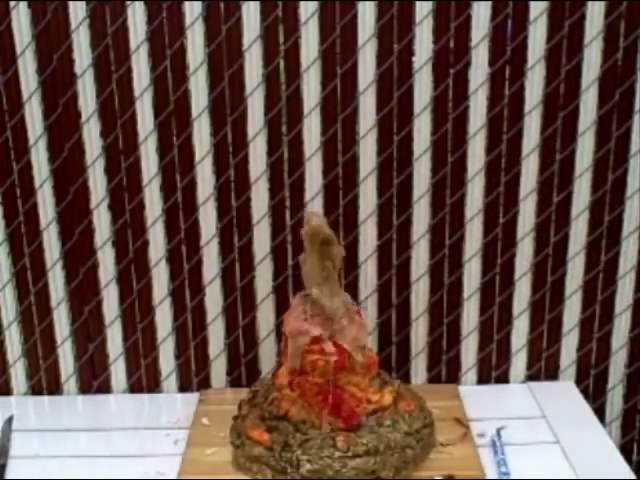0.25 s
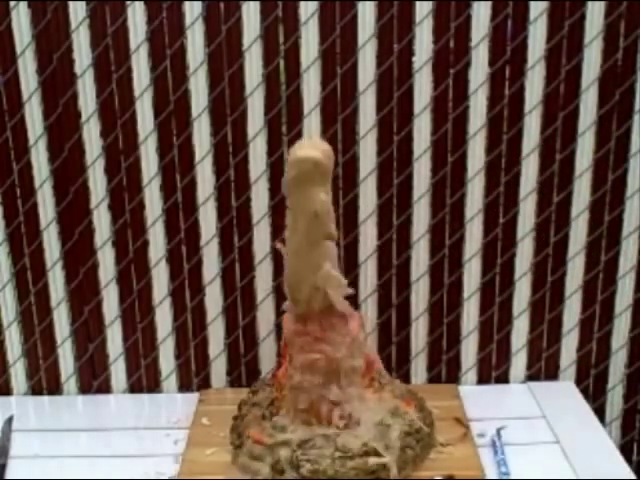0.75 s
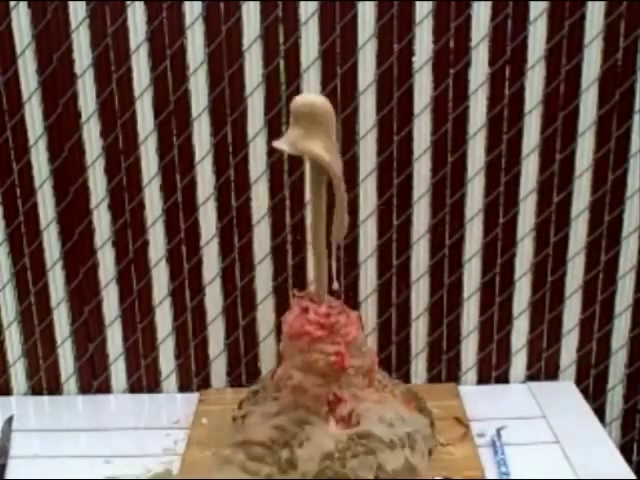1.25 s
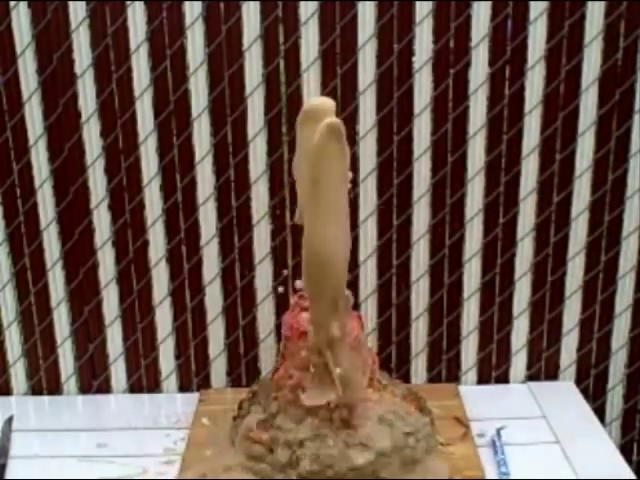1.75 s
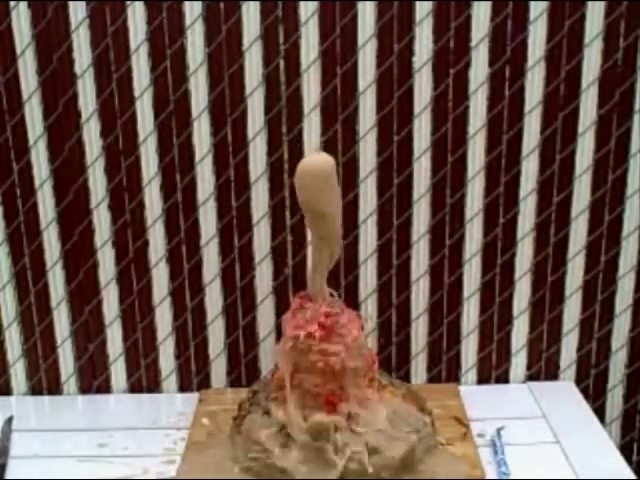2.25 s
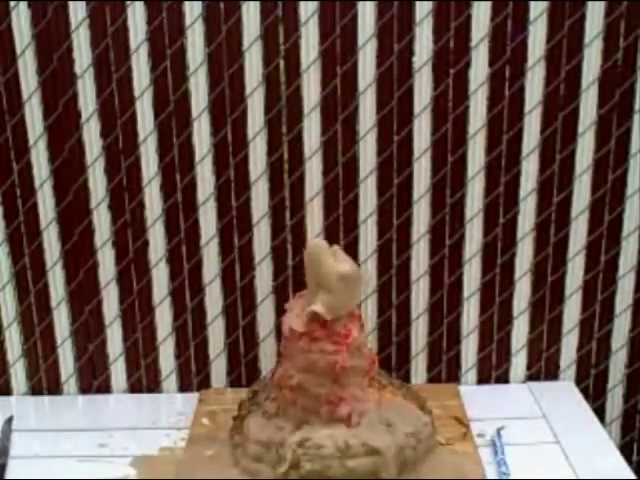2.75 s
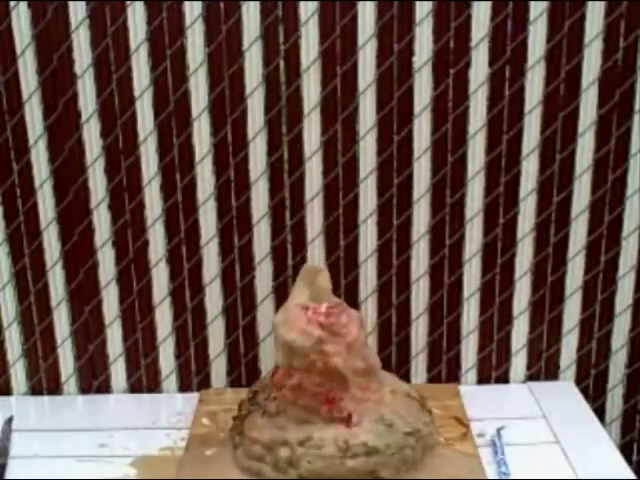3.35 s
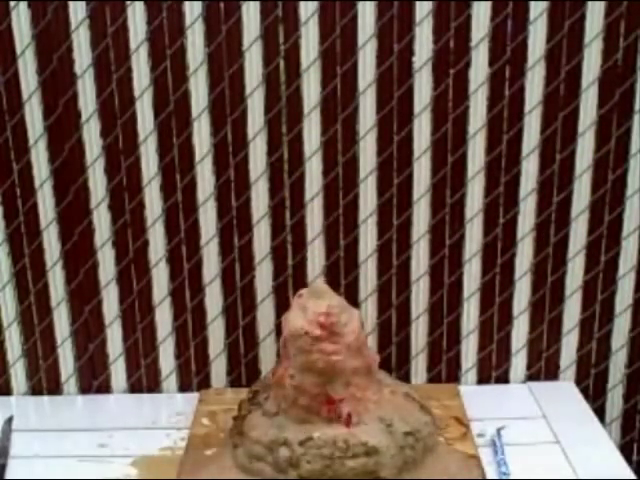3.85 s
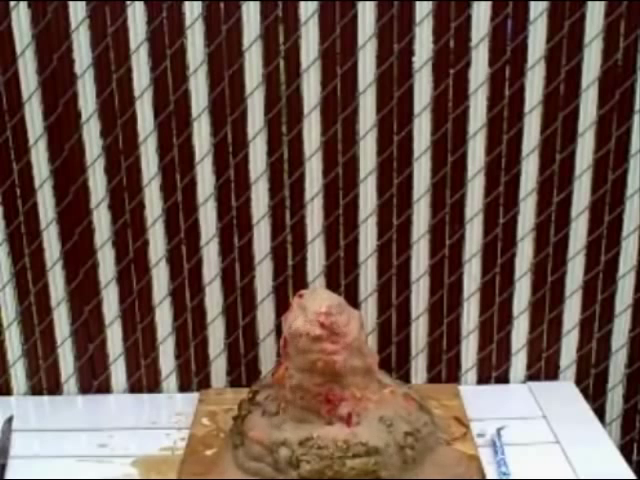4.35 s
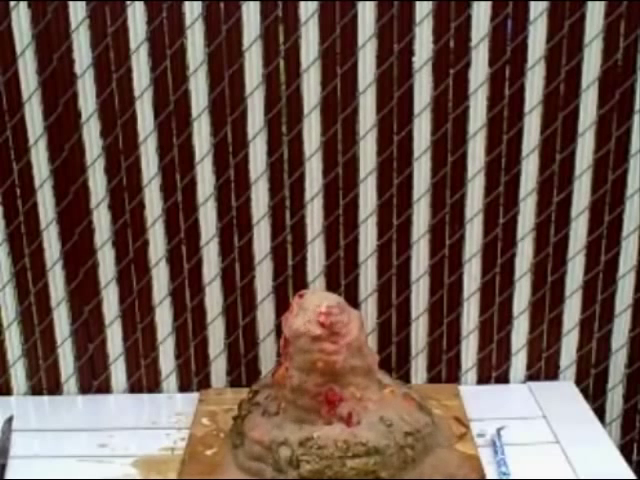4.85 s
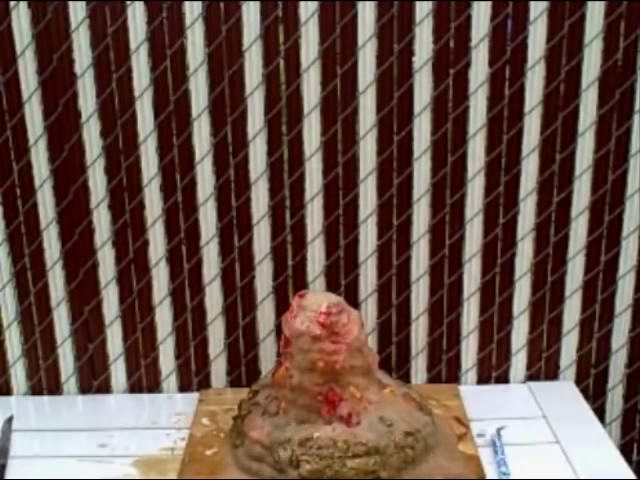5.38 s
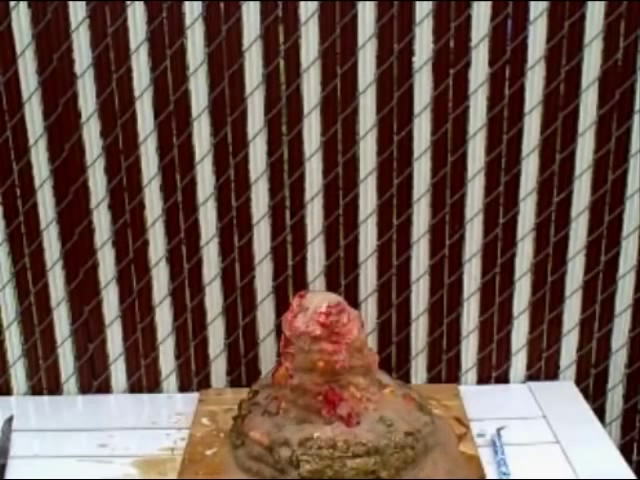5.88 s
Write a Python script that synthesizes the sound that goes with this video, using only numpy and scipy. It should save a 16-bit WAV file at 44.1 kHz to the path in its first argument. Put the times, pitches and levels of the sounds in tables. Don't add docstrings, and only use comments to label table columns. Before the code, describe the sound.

Outdoors, a fizzy drink bursts upward and splashes back in three heavy slaps, then crackling fizz and drips continue over distant traffic hum.

```python
import sys
import numpy as np
from scipy import signal
from scipy.fft import rfft, irfft, next_fast_len
from scipy.io import wavfile
from scipy.ndimage import uniform_filter1d, minimum_filter1d

SR = 44100
rng = np.random.default_rng(int(sys.argv[2]) if len(sys.argv) > 2 else 0)


def volts_from_db(level):
    exponent = np.asarray(level, float) / 20
    return 10 ** exponent


def put_to_file(sound):
    columns = np.atleast_2d(sound).T
    safe = np.clip(columns, -1, 1)
    whole_steps = np.round(safe * 32767)
    wavfile.write(sys.argv[1], SR, whole_steps.astype(np.int16))


N = 269662
TIME = np.arange(N) / SR
FAST = next_fast_len(N)
BINS_HZ = np.maximum(np.fft.rfftfreq(FAST, 1 / SR), 1)
CAMERA_HZ = 16000
SHOULDER_HZ, TOP_HZ, EDGE_HZ = 6070, 6390, 7284

# [f/Hz, level/dB]
SPATTER_COLOUR = [(500, -16), (1000, -7.5), (2200, -1), (3600, -2), (4200, -3.5), (5000, -6), (6000, -2.5),
                  (7400, -8.5)]
# [f/Hz, level/dB]
BODY_COLOUR = [(90, -1), (200, -6), (500, -2.5), (1000, -5.5), (1600, -10), (3000, -27)]


def unit(x):
    return x / np.sqrt(np.mean(x ** 2))


def course(points):
    return np.interp(TIME, *np.transpose(points))


def colour(x, points):
    hz, db = np.transpose(points)
    gain = volts_from_db(np.interp(np.log(BINS_HZ), np.log(hz), db))
    return irfft(rfft(x, FAST) * gain, FAST)[:N]


def band(x, lo_hz, hi_hz):
    inside = (BINS_HZ >= lo_hz) & (BINS_HZ < hi_hz)
    return irfft(rfft(x, FAST) * inside, FAST)[:N]


def walk(rate_hz):
    k = int(SR / rate_hz)
    held = np.repeat(rng.standard_normal(N // k + 1), k)[:N]
    return unit(uniform_filter1d(uniform_filter1d(held, k), k))


def fade(x, t60_s):
    pole = np.exp(-np.log(1000) / (t60_s * SR))
    return signal.lfilter([1], [1, -pole], x)


def patter(rate_hz, spread_db, t60_s, bed):
    chance = rng.random((2, N))
    sizes = volts_from_db(-spread_db * np.log(1 - chance[1]))
    drops = (chance[0] < rate_hz / SR) * sizes
    return unit(bed + unit(fade(drops, t60_s)))


def hiss(points, gate):
    noise = rng.standard_normal(N)
    return colour(noise * gate, points) / np.std(colour(noise, points))


def foam():
    # [t/s, level/dB]
    flow_course = [(0.0, -60.5), (0.174, -59.5), (0.528, -51), (0.862, -49), (1.0, -51), (1.078, -41),
                   (1.236, -44), (1.3, -35), (1.42, -36.5), (1.5, -43), (1.67, -37.5), (1.78, -43.5),
                   (1.92, -40.5), (2.41, -41.5), (3.13, -40.5), (4.03, -43.5), (4.54, -43.5), (6.11, -42.5)]
    # [f/Hz, level/dB]
    fizz_colour = [(4000, -27), (4700, -15.5), (5200, -14.5), (5400, -5), (5850, -1), (6250, -9),
                   (6600, -6), (7400, -11.5)]
    usual_flow_db, fizz_starts_s = -43, 0.15
    surge_db = 0.49 * walk(20)
    flow_db = course(flow_course)
    extra_db = flow_db - usual_flow_db
    fizz_db = -42.5 + 1.03 * extra_db + 1.5 * walk(4)
    fizz_db -= 200 * np.maximum(fizz_starts_s - TIME, 0)
    body_db = -51 + 0.45 * extra_db + 1.3 * walk(4)

    drops = patter(600, 2.5, 0.015, 1.2)
    bubbles = patter(340, 2.6, 0.027, 0.44)
    spatter = hiss(SPATTER_COLOUR, drops * volts_from_db(flow_db + surge_db + 2.5 + 0.92 * walk(30)))
    fizz = hiss(fizz_colour, bubbles * volts_from_db(fizz_db + surge_db + 5.0 + 1.1 * walk(25.21)))
    body = hiss(BODY_COLOUR, np.sqrt(drops) * volts_from_db(body_db + surge_db + 0.83))
    return spatter + fizz + body


def strays(count):
    chance = rng.standard_normal((count, 3)).T
    start_s = np.linspace(2.4, TIME[-1] - 0.1, count) + 0.04 * np.tanh(chance[0])
    levels_db = -32.5 + 3 * np.tanh(chance[1:])
    return np.transpose([start_s, *levels_db])


def splats():
    # [t/s, peak/dB, port band/dB]
    early_drops = [(.1864, -39.5, -37), (.359, -38.5, -53), (.4394, -39.5, -35), (.5262, -28.5, -53),
                   (.5851, -38.5, -40), (.742, -33.5, -42), (.7542, -26.5, -32.5), (.8011, -26, -34),
                   (.821, -36, -47), (.8362, -21, -28), (.8427, -33, -41.5), (.9514, -43, -28.5),
                   (.9931, -33, -50), (1.022, -35, -28), (1.041, -27.5, -30)]
    # [t/s, peak/dB, port band/dB]
    column_slaps = [(1.058, -33, -40), (1.08, -30, -25.5), (1.1059, -26, -28), (1.119, -28, -22.5),
                    (1.1325, -16.5, -23), (1.1423, -16.5, -18), (1.1554, -9.5, -9), (1.168, -14.5, -8.5),
                    (1.1747, -11.5, -9.5), (1.1878, -17, -20), (1.2076, -38, -23.5), (1.25, -10.5, -41),
                    (1.263, -6, -10), (1.294, -15.5, -43), (1.3359, -2, -20), (1.3422, -15.5, -17),
                    (1.3462, -30, -3.5), (1.358, -15, -18.5), (1.3815, -19.5, -15.5), (1.402, -18, -12.5),
                    (1.4103, -28, -29)]
    # [t/s, peak/dB, port band/dB]
    foam_drips = [(1.456, -16, -43), (1.5206, -27.5, -46), (1.5464, -22.5, -54), (1.6233, -13.5, -39),
                  (1.768, -20.5, -27.5), (1.83, -26.5, -22.5), (1.881, -17, -24.5), (1.924, -19, -32),
                  (1.961, -30, -23), (2.038, -19.5, -29), (2.159, -20, -26), (2.255, -19, -23),
                  (2.3168, -15, -18.5), (2.3484, -22, -26), (2.5519, -19.5, -28), (2.635, -27.5, -25),
                  (2.75, -22, -27.5),
                  (2.905, -24.5, -29), (3.107, -23, -31.5), (3.139, -22.5, -29.5), (3.399, -18, -34),
                  (3.416, -23.5, -32), (3.5922, -18.5, -21), (3.696, -27, -28.5), (3.8477, -28.5, -45),
                  (4.039, -26, -37), (4.084, -22.5, -40.5), (4.3312, -25.5, -26.5), (4.6196, -26.5, -28),
                  (4.9883, -23.5, -29.5), (5.0817, -27, -23.5), (5.115, -26.5, -28), (5.1743, -23.5, -26.5),
                  (5.278, -25.5, -27), (5.37, -25, -26.5), (5.448, -24.5, -24.5), (5.5298, -24.5, -34),
                  (5.7154, -22, -30.5), (5.816, -24.5, -26.5), (5.994, -21.5, -23.5)]
    # [f/Hz, level/dB]
    port_colour = [(3800, -31.5), (4500, -10), (5030, -3), (5250, -0.5), (5550, -5.5), (5850, 0.5),
                   (6250, -6.5), (7400, -7.5)]
    thud_db, thud_of_ring_db = -21, -19.5
    late = [*foam_drips, *strays(count=18)]

    gates = np.zeros((3, N))
    age_s = TIME[:int(SR * 0.3)]
    for rows, t60_s in [(early_drops, 0.054), (column_slaps, 0.065), (late, 0.105)]:
        swell = 1 - np.exp(-age_s / (0.075 * t60_s))
        shape = swell * np.exp(-np.log(1000) * age_s / t60_s)
        for start_s, peak_db, port_db in rows:
            thud = volts_from_db(peak_db + thud_db) + volts_from_db(port_db + thud_of_ring_db)
            sizes = [volts_from_db(peak_db - 7.0), volts_from_db(port_db + 1.0), thud]
            start = int(start_s * SR)
            stop = min(start + len(age_s), N)
            gates[:, start:stop] += np.outer(sizes, shape[:stop - start])
    gates *= patter(800, 1.5, 0.0072, 1.9)
    return hiss(SPATTER_COLOUR, gates[0]) + hiss(port_colour, gates[1]) + hiss(BODY_COLOUR, gates[2])


def ticks():
    # [t/s, tick peak/dB, port ring peak/dB]
    hard_drops = [(0.801, -25.5, -41), (0.844, -21.5, -41), (0.951, -39, -40), (1.143, -16, -21),
                  (1.157, -15.5, -10.5), (1.262, -16.5, -18.5), (1.338, -12.5, -11), (1.341, -15, -19),
                  (1.381, -14, -18.5), (1.401, -19, -19.5), (1.829, -30, -31.5), (2.317, -18, -27),
                  (2.554, -26, -33), (2.541, -21, -38), (2.907, -26.5, -39), (3.418, -23.5, -39.5),
                  (3.592, -23, -30), (4.949, -29, -32), (5.116, -31, -32), (5.279, -30, -37),
                  (5.996, -24.5, -28.5)]
    out = np.zeros(N)
    age_s = TIME[:int(SR * 0.02)]
    click = np.sin(2 * np.pi * 2300 * age_s) * np.exp(-age_s / 0.00027)
    swell = age_s / 0.00089 * np.exp(1 - age_s / 0.0013)
    detunes = rng.uniform(-1.2, 1, len(hard_drops))
    for (start_s, tick_db, ring_db), detune in zip(hard_drops, detunes):
        ring = swell * np.sin(2 * np.pi * (5500 + 350 * detune) * age_s)
        start = int(start_s * SR)
        out[start:start + len(age_s)] += click * volts_from_db(tick_db + 4.0) + ring * volts_from_db(ring_db)
    return out


def engine():
    # [t/s, level/dB]
    drone_level = [(0.0, -44.5), (0.66, -40.5), (0.94, -47), (1.14, -43), (1.31, -59), (1.58, -37.5),
                   (1.67, -45.5), (2.3, -35), (2.45, -47), (2.87, -40), (3.45, -48), (3.61, -43),
                   (4.17, -37.5), (4.65, -40), (4.9, -48.5), (5.36, -45.5), (5.63, -46), (6.11, -51.5)]
    # [t/s, f/Hz]
    drone_pitch = [(0, 51.35), (1.2, 51.3), (1.5, 50.13), (2.4, 48), (2.7, 51.6), (3.15, 43), (4.7, 39.6),
                   (5.6, 36.52), (6.11, 39.1)]
    low_hz, arrives_s, leaves_s, leaving_s = 27.2, 0.14, 0.77, 0.04
    low_db = -33 - 21.5 / (1 + np.exp((leaves_s - TIME) / leaving_s))
    low_db -= 12 * np.maximum(1 - TIME / arrives_s, 0)
    low_db += -1.5 + 1.5 * walk(7.9)
    low = np.sin(2 * np.pi * np.cumsum(low_hz * (1 + 0.05 * walk(22))) / SR)

    phase = 2 * np.pi * np.cumsum(course(drone_pitch)) / SR
    flutter = (0.93 + 0.41 * walk(13)) * np.sin(phase) + 0.5 * walk(13) * np.cos(phase)
    fifth = 0.3 * (1 + 0.5 * walk(5)) * np.sin(3 / 2 * phase)
    upper = unit(flutter) + fifth
    return low * volts_from_db(low_db) + upper * volts_from_db(course(drone_level) - 0.7)


def town():
    # [f/Hz, level/dB per Hz]
    hum_colour = [(12, -19.5), (30, -6), (55, -5.5), (75, -6.5), (100, -15), (200, -19), (400, -29.5),
                  (840, -37), (4000, -62)]
    hum = unit(colour(rng.standard_normal(N), hum_colour))
    return hum * volts_from_db(-45.5 + 0.56 * walk(1.536))


def scene():
    return (foam() + splats() + ticks() + engine() + town())[None]


def attacks(x):
    threshold_db, softness_db = 9.5, 1
    power = band(x, 600, EDGE_HZ) ** 2 + 1e-12
    jump_db = 10 * np.log10(uniform_filter1d(power, size=131) / uniform_filter1d(power, size=2001))
    return uniform_filter1d(np.exp((jump_db - threshold_db) / softness_db), size=131)


def quantise(x):
    # [f/Hz, step/dB]
    coarseness = [(100, -18.5), (320, -11), (600, 1), (2500, 2.5), (3500, 5), (3700, 9), (3880, 5.5),
                  (4050, 4.5), (5500, 3), (7300, -0.5)]
    frames = dict(window="cosine", nperseg=2048, noverlap=1024)
    hz, _, lines = signal.stft(x, SR, **frames)
    level = np.sqrt(uniform_filter1d(np.abs(lines) ** 2, size=25, axis=0))
    level = minimum_filter1d(level, size=3, axis=1) + 1e-12
    at_hz, at_db = np.transpose(coarseness)
    step_db = np.interp(hz, at_hz, at_db)[:, None]
    groups = rng.standard_normal((2, len(hz) // 8 + 1, lines.shape[1]))
    chance = np.repeat(groups, 8, axis=1)[:, :len(hz)]
    step = level * volts_from_db(step_db + 3.2 * chance[0])
    rounded = step * np.round(lines / step) * volts_from_db(1.86 * chance[1])
    return signal.istft(rounded, SR, **frames)[1][:N]


def band_gain(column):
    # [t/s, length/s, shoulder band/dB]
    dropouts = [(1.065, .022, 0), (1.103, .113, -11), (1.254, .08, -12), (1.352, .075, -18),
                (1.448, .02, -14), (1.528, .022, -1), (1.622, .054, 0), (1.878, .025, -15),
                (1.945, .03, -15), (2.218, .019, -12), (2.31, .023, -14), (2.395, .02, -5),
                (2.537, .051, -8), (2.762, .019, 0), (2.998, .023, 0), (3.125, .025, -15),
                (3.27, .055, -10), (3.399, .036, 0), (3.624, .067, 0), (3.77, .048, 0), (3.959, .054, -2),
                (4.055, .07, -3), (4.281, .036, -5), (4.444, .067, -1), (4.776, .118, -7), (4.918, .022, 0),
                (5.368, .025, -9), (5.624, .022, 0), (5.785, .041, -8), (5.927, .023, -3)]
    blink_times = [.517, .917, 1.029, 1.826, 2.033, 2.183, 2.633, 2.716, 2.941, 4.693, 5.108, 5.148, 5.197,
                   5.308, 5.448, 5.494, 5.69, 5.989, 6.1]
    # [t/s, length/s, top band/dB, shoulder band/dB]
    starved = [
        (1.162, .045, -24, 3),
        (1.342, 0.06, -18, -8),
    ]
    blink_s, blink_shoulder_db, edge_s = 0.012, -5, 0.004
    db = 1.55 * walk(30.19)
    gaps = [*dropouts, *((start_s, blink_s, blink_shoulder_db) for start_s in blink_times)]
    cuts = []
    for start_s, length_s, shoulder_db in gaps:
        top_db = -23.5 - 1.5 * np.log2(length_s / blink_s)
        cuts.append((start_s, length_s, shoulder_db, top_db))
    for start_s, length_s, top_db, shoulder_db in starved:
        cuts.append((start_s, length_s, shoulder_db, top_db))
    for start_s, length_s, *cut_db in cuts:
        inside = (TIME > start_s - edge_s) & (TIME < start_s + length_s + edge_s)
        db = db + min(cut_db[column], 0) * inside
    return uniform_filter1d(volts_from_db(uniform_filter1d(db, size=301)), size=301)


def residue():
    edges_hz = np.linspace(TOP_HZ, CAMERA_HZ / 2, num=9)
    total = np.zeros(N)
    for lo_hz, hi_hz in zip(edges_hz, edges_hz[1:]):
        total += band(rng.standard_normal(N), lo_hz, hi_hz) * volts_from_db(11.2 * walk(14))
    return total * volts_from_db(-77.0 + 20 * np.minimum(TIME - 1.2, 0))


def band_limit(x):
    return signal.sosfilt(signal.butter(12, 11460, fs=SR, output="sos"), x)


def record(dry):
    # [f/Hz, level/dB]
    narrow_notch = [(3550, -0.5), (3720, 1.5), (3860, -4.5), (4000, 0)]
    # [f/Hz, level/dB]
    mirror_colour = [(7000, 2), (8700, -6.5), (9500, -17), (10100, -24.5), (10700, -36), (11300, -66),
                     (11800, -100)]
    heard = colour(np.tanh(1.32 * dry[0]) / 1.279, narrow_notch)
    sharp = attacks(heard)
    full = sharp * heard + (1 - sharp) * quantise(heard)

    shoulder = band(full, SHOULDER_HZ, TOP_HZ) * band_gain(column=0)
    top = band(full, TOP_HZ, EDGE_HZ) * band_gain(column=1)
    kept = band(full, 0, SHOULDER_HZ) + shoulder + top + residue()

    image = 2 * kept * np.cos(2 * np.pi * CAMERA_HZ * TIME)
    mirror = colour(band(image, CAMERA_HZ / 2, SR / 2), mirror_colour)
    return band_limit((kept + mirror)[None])


dry = scene()
out = record(dry)
put_to_file(out)
```